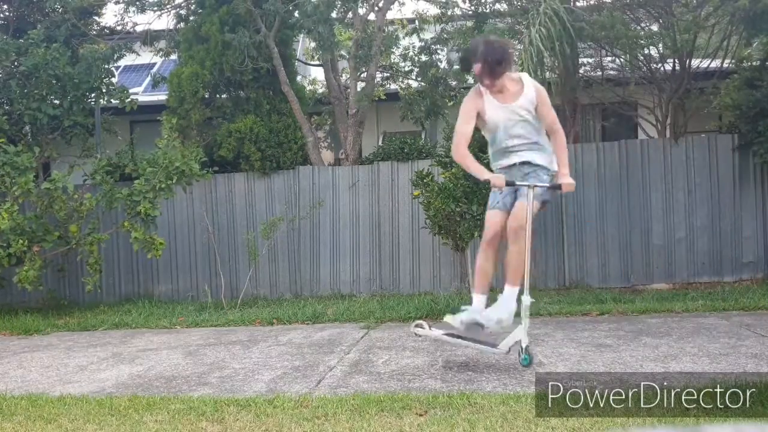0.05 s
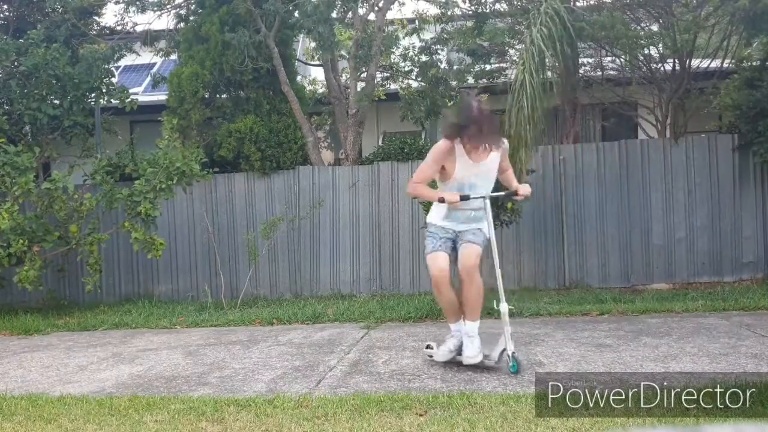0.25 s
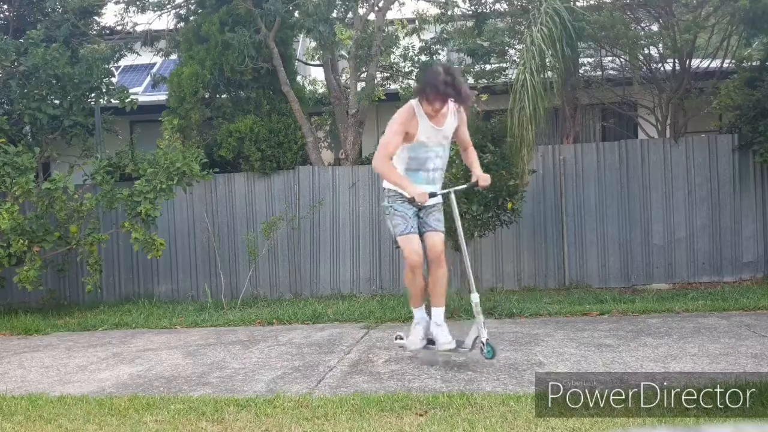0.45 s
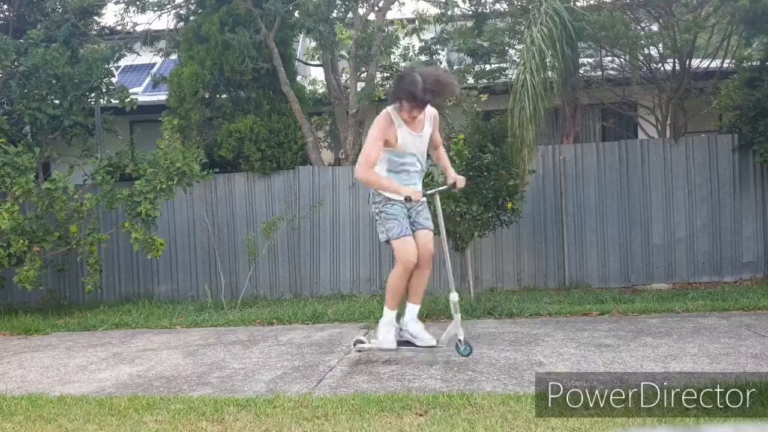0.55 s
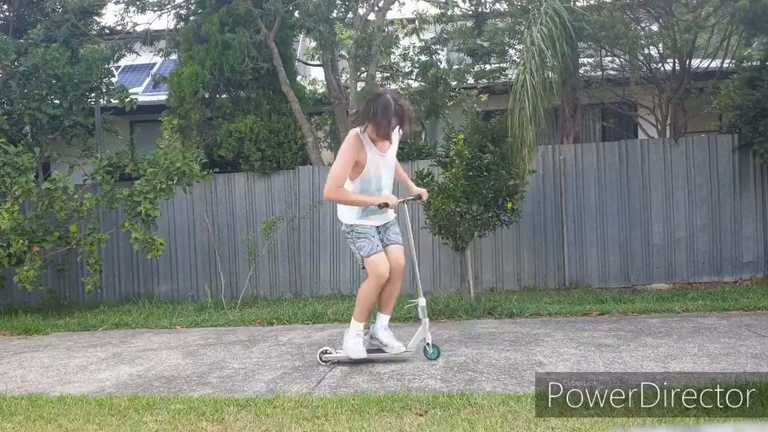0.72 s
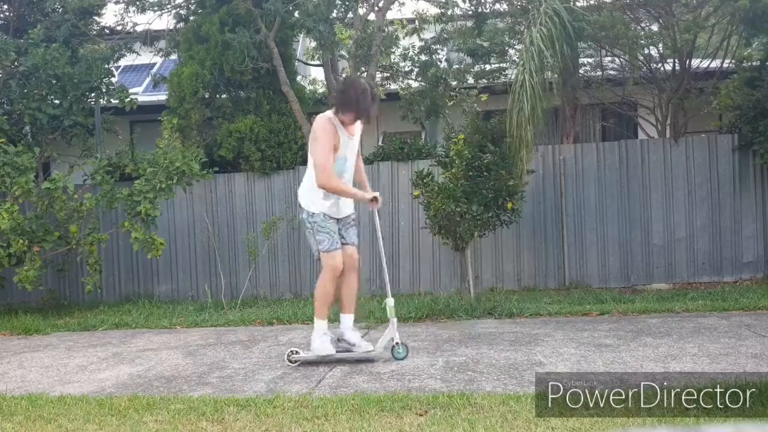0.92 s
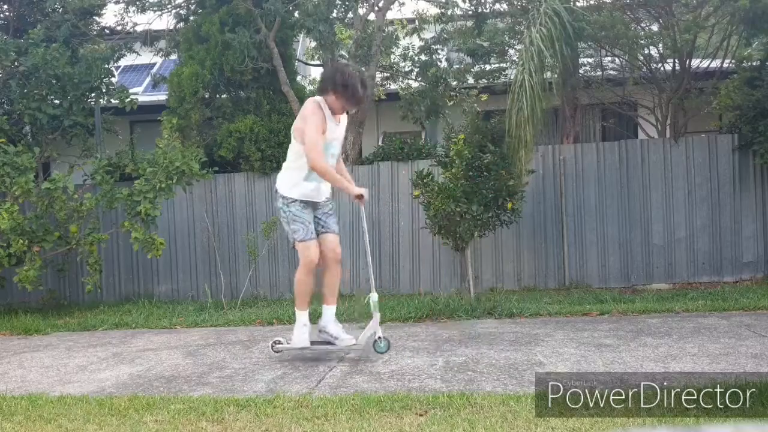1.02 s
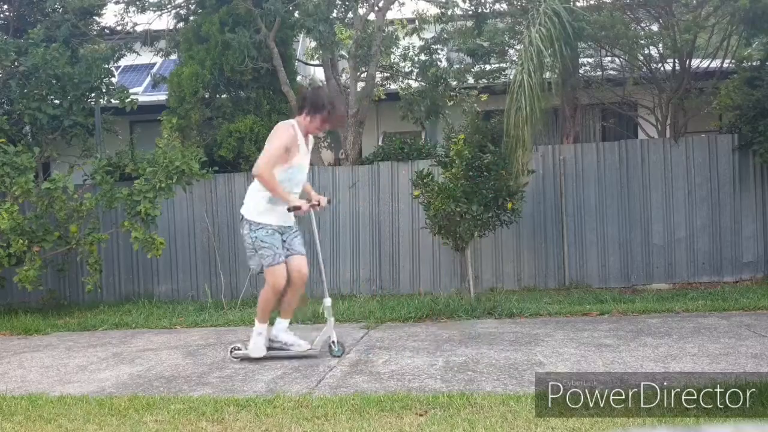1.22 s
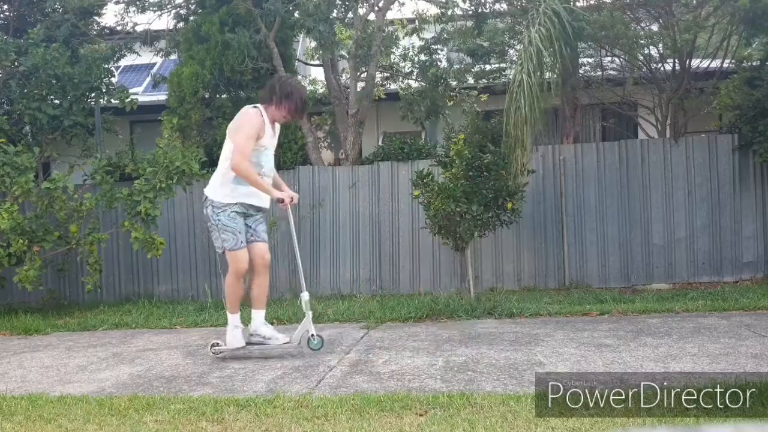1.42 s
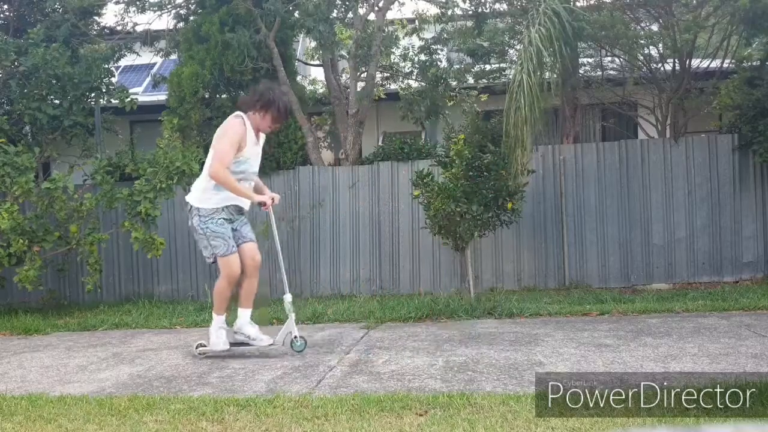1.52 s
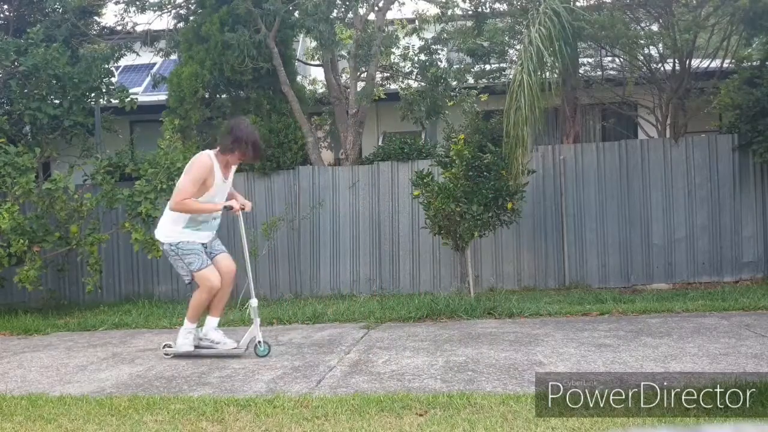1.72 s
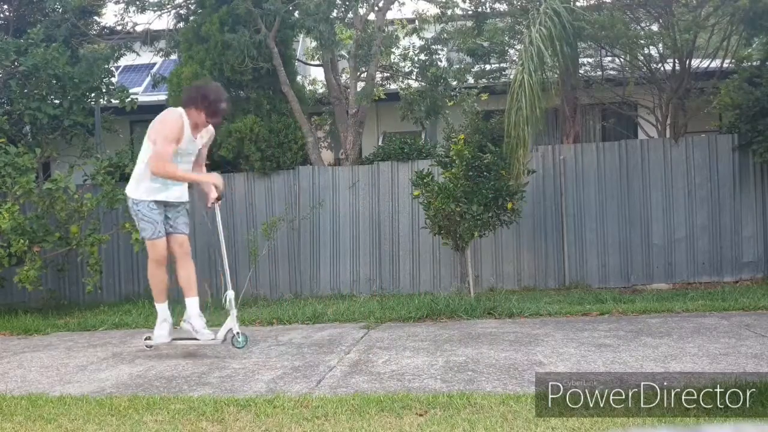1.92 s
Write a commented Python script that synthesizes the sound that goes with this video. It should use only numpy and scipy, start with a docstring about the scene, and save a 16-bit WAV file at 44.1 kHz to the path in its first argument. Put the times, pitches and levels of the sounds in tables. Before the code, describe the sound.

A scooter slams down on concrete, its deck knocking and its metal bars rattling. It then hops three times with smaller clacks, drifting slightly from right to left, with faint wheel whirr and a short echo in a quiet yard.

```python
"""A stunt scooter on concrete

A scooter lands hard on a driveway, then hops three times from right to left, its wheels whirring.
Each contact thumps, knocks the deck and rattles the metal fork and bars; the hardest slam the tyres
and crack sharply. A fence returns one echo; the yard adds a short tail, a low rumble and a faint hiss."""
import sys
import numpy as np
from scipy import signal
from scipy.fft import rfft, irfft
from scipy.io import wavfile
from scipy.ndimage import uniform_filter1d

SR = 44100
rng = np.random.default_rng(int(sys.argv[2]) if len(sys.argv) > 2 else 0)


def store_pcm(level_fs):
    """Save levels as 16-bit WAV."""
    pcm = np.round(np.clip(level_fs, -1, 1) * 32767).astype(np.int16)
    wavfile.write(sys.argv[1], SR, np.atleast_2d(pcm).T)


N = 85995
T = np.arange(16384) / SR  # seconds since a contact
METAL_CORRELATION = 0.77  # between left and right

# Modes of wheels and rider. Each row: frequency in Hz, relative level in dB, T60 in seconds.
THUMP_MODES = [(81.6, -2.5, 0.072), (145, 7, 0.036)]
# Spectrum of a bright snap. Each row: frequency in Hz, relative level in dB.
SNAP_SPECTRUM = [(3000, -7.5), (7400, -2.5), (9300, -4.5), (11300, 2), (13200, -9), (16500, -4.5)]


def amp(db):
    """Decibels as an amplitude ratio."""
    return 10 ** (np.asarray(db) / 20)


def read(points, hz):
    """Interpolation on a logarithmic frequency axis."""
    f, value = np.transpose(points)[:2]
    return np.interp(np.log(hz + 1), np.log(f), value)


def freqs(x):
    """The Fourier frequencies of x in Hz."""
    return np.fft.rfftfreq(x.shape[-1], 1 / SR)


def colour(x, points):
    """Minimum-phase filtering by a (Hz, dB) spectrum: no sound precedes its cause."""
    size = x.shape[-1]
    log_gain = np.log(amp(read(points, abs(np.fft.fftfreq(size, 1 / SR)))))
    response = np.exp(np.conj(signal.hilbert(log_gain)))[:size // 2 + 1]
    return irfft(rfft(x) * response, size)


def blow(x, db):
    """Energy scaling: x gets the energy of 16 ms of sound at this level."""
    energy = np.mean(np.sum(x ** 2, -1))
    return amp(db) * x / np.sqrt(energy / (0.016 * SR) + 1e-20)


def add(mix, s, sound):
    """Superposition: the sound joins the mix at s seconds."""
    part = mix[:, max(round(s * SR), 0):][:, :sound.shape[-1]]
    part += sound[..., :part.shape[-1]]


def diffuse(size):
    """A diffuse field: the channels are alike at long wavelengths, unrelated at short ones."""
    # Each row: frequency in Hz, left-right correlation.
    coherence = [(30, 0.93), (80, 0.73), (300, 0.87), (800, 0)]
    noise = rng.standard_normal((2, size))
    left, other = rfft(noise)
    same = read(coherence, freqs(noise))
    return irfft(np.array([left, same * left + np.sqrt(1 - same ** 2) * other]), size)


def open_air():
    """Ambient noise: diffuse rumble, midrange air and hiss, each drifting in level."""
    # Spectra. Each row: frequency in Hz, relative spectral density in dB.
    rumble, air, hiss = [(20, -28), (45, 10), (58, -1), (74, 3), (100, -6.5), (138, -8.5), (400, -58.5)], [(150, -2), (250, -2), (500, -3), (900, -4), (2100, -10.5),
                                         (3000, -18), (9000, -37)], [(2000, -16.5), (3500, -4), (7300, 3), (8500, -4),
                                                      (15000, -6.5)]
    # Envelopes. Each row: time in seconds, level in dB.
    rumble_level = [(0, -38), (.95, -44), (1.2, -51), (1.6, -50), (1.95, -45)]
    air_level = [(0, -49), (.6, -55.5), (1.2, -59.5), (1.95, -61)]
    hiss_level = [(0, -63.5), (1.95, -67.5)]
    t, out = np.arange(N) / SR, np.zeros((2, N))
    for spectrum, level in (rumble, rumble_level), (air, air_level), (hiss, hiss_level):
        noise = colour(diffuse(N), spectrum)
        out += noise / noise.std() * amp(np.interp(t, *np.transpose(level)))
    return out


def wheels(fade_s=0.052):
    """Band-limited noise: the wheels whirr, spinning in the air and then rolling on concrete."""
    # Each row: start and end in seconds, centre and width in Hz, level in dB.
    bands = [(-.08, 0.16, 623, 55, -52), (-.05, 0.232, 1500, 940, -57.5), (0.325, 0.65, 4300, 1520, -67.5),
             (0.78, 1.19, 2025, 237, -69)]
    t, out = np.arange(N) / SR, np.zeros((2, N))
    for start, end, hz, width_hz, db in bands:
        whirr = irfft(rfft(diffuse(N)) / (1 + (2 * (freqs(t) - hz) / width_hz) ** 2), N)
        fade = np.clip(np.minimum(t - start, end - t) / fade_s, 0, 1)
        out += amp(db) * whirr / whirr.std() * fade
    return out


def ring(modes, retune=0.025):
    """Free vibration as damped sines; the rider's shifting load retunes them for every blow."""
    shifts = 1 + retune * rng.uniform(-1.02, 1, len(modes))
    return sum(amp(db - 60 * T / t60) * np.sin(2 * np.pi * hz * shift * T)
               for (hz, db, t60), shift in zip(modes, shifts))


def body(thump_db, knock_db, bright_hz):
    """Modal response of wheels, rider and deck: a softer blow excites fewer high deck modes."""
    # Each row: frequency in Hz, relative level in dB, T60 in seconds.
    deck_modes = [(239.6, 4.5, 0.068), (336, 0.5, 0.018), (406.6, 0.5, 0.063), (590, -7.5, 0.055),
                  (710, -2, 0.032), (818, -9.5, 0.08), (869, -7.5, 0.052), (1190, -34, 0.04)]
    driven = [(hz, db - 10 * np.log10(1 + (hz / bright_hz) ** 4), t60) for hz, db, t60 in deck_modes]
    knock = ring(driven[::2]) - ring(driven[1::2])  # neighbouring modes alternate in sign
    thump = ring(THUMP_MODES) * (1 - np.exp(-T / 0.0076))
    return blow(thump, thump_db) + blow(knock, knock_db)


def rattle(decay_s, correlation, rise_s=0.0005, grain_db=1.5):
    """Tiny uneven impacts merge into an exponentially decaying burst of noise."""
    left, other, grain = rng.standard_normal((3, len(T)))
    grain = uniform_filter1d(grain, size=25) * np.sqrt(25)  # smoothed, with unit variance
    envelope = (1 - np.exp(-T / rise_s)) * np.exp(-T / decay_s) * amp(grain_db * grain)
    return envelope * np.array([left, correlation * left + np.sqrt(1 - correlation ** 2) * other])


def favour(hz, centre_hz, peak_db, octaves):
    """Selective excitation: extra dB near the resonance that a contact drives hardest."""
    return peak_db * np.exp(-.5 * (np.log2(hz / centre_hz) / octaves) ** 2)


def peaked(points, *resonance):
    """A spectrum with a resonance peak added."""
    hz = np.geomspace(100, 16000, 200)
    return np.transpose([hz, read(points, hz) + favour(hz, *resonance)])


def tubes(*resonance, grip_s=0.015):
    """Damped resonance: the fork and bars ring while the rider's grip absorbs their energy."""
    # Each row: frequency in Hz, relative level in dB, T60 in seconds without the grip.
    tube_modes = [(3100, 0, 0.05), (3830, -0.5, 0.028), (4091, 6.5, .032), (4270, -6, 0.037),
                  (5044, -11, 0.22), (5440, -9, 0.017), (5460, 0, 0.031), (6150, -0.5, 0.047)]
    driven = [(hz, db + favour(hz, *resonance), t60) for hz, db, t60 in tube_modes]
    return ring(driven) * np.exp(-T / grip_s)


def hardware(clack_db, clack_hz, metal_db, metal_hz, snap_db, decay_s):
    """Impact noise and forced vibration: a wheel clacks, and loose parts rattle and drive the tubes."""
    # Spectra of wheel and metal noise. Each row: frequency in Hz, relative level in dB.
    clack_spectrum = [(300, -25), (750, 3.5), (1250, -0.5), (2100, -3.5), (2900, -5.5), (5000, -14),
                      (16000, -70.5)]
    clank_spectrum = [(1500, -49), (2800, 7), (3450, -11.5), (4100, 4), (4800, 2), (5600, 1.5), (6300, -3),
                      (7300, -2.5), (16000, -26.5)]
    wheel, metal = (clack_hz, 11.5, 0.16), (metal_hz, 9.5, 0.17)  # resonances: Hz, dB, octaves
    shake = rattle(decay_s, METAL_CORRELATION)
    ringing = signal.fftconvolve(shake, tubes(*metal)[None], axes=1)[:, :len(T)]
    clack = colour(rattle(decay_s, correlation=0.73), peaked(clack_spectrum, *wheel))
    clank = colour(rattle(decay_s, METAL_CORRELATION), peaked(clank_spectrum, *metal))
    snap = colour(rattle(decay_s, correlation=0.083), SNAP_SPECTRUM)
    return (blow(clack, clack_db) + blow(ringing, metal_db - 9.5)
            + blow(clank, metal_db - 2.5) + blow(snap, snap_db))


def click(spectrum, db, decay_s=0.00068):
    """A hard, very short contact radiates a broad band."""
    return blow(colour(rattle(decay_s, METAL_CORRELATION), spectrum), db)


def slam(db, hz, rise_s=0.00036, decay_s=0.0018):
    """Volume displacement: a squashed tyre pushes out one heavily damped pulse of air."""
    return blow(np.sin(2 * np.pi * hz * T) * (1 - np.exp(-T / rise_s)) * np.exp(-T / decay_s), db)


def clang(db, hz, peak_db=29, octaves=0.096):
    """Impulse response: the fork strikes the tubes directly, ringing mainly the modes near hz."""
    return blow(tubes(hz, peak_db, octaves), db)[None]


def contacts():
    """Impact excitation: every contact as (start in seconds, low part, high part)."""
    # Wheel contacts. Each row: start in seconds, thump in dB, knock in dB, knock cutoff in Hz, clack
    # in dB, its centre in Hz, base metal level in dB, its centre in Hz, snap in dB, decay in seconds.
    hits = [(0.2171, -47, -36.5, 704, -54, 1370, -47.5, 5700, -64, 0.0095),
            (0.2235, -47, -40, 900, -42.5, 900, -44, 5700, -68, 0.0061),
            (0.2419, -17.5, -23, 606, -36, 1150, -35.5, 4600, -51, 0.0073),
            (0.2528, -26.5, -20.5, 760, -32.5, 815, -33.5, 3500, -37.5, 0.0057),
            (.2560, -49, -18.5, 930, -42.5, 1090, -26.5, 5630, -33, 0.0064),
            (0.2829, -34, -36.5, 450, -45.5, 2220, -37, 4030, -40, 0.0094),
            (.3185, -37, -38, 396, -39.5, 1264, -61, 4500, -61, 0.0081),
            (0.7351, -19.5, -29, 450, -38.5, 910, -49.5, 4200, -74, .005),
            (0.7385, -41, -30, 497, -41.5, 2110, -41, 5650, -55, 0.0048),
            (0.7447, -23.5, -29, 510, -47, 774, -49, 4100, -65, 0.007),
            (.7620, -58, -33.5, 403, -52, 2050, -51.5, 6040, -56.5, 0.0097),
            (1.251, -58, -42.5, 380, -49.5, 1730, -59, 4180, -61, 0.017),
            (1.2761, -37, -30, 320, -41, 1730, -40.5, 4130, -49, 0.0046),
            (1.2972, -37.5, -33.5, 556, -49, 1150, -44, 6900, -63, 0.0056),
            (1.324, -38, -41.5, 277, -54, 1780, -63, 4340, -64, 0.0051),
            (1.4938, -76, -94, 600, -56.5, 2150, -51, 3250, -57, 0.0018),
            (1.6773, -35.5, -45, 404, -41.5, 1340, -51.5, 4100, -65.5, 0.0068),
            (1.6845, -39.5, -37.5, 490, -45, 1550, -54, 4100, -68, 0.0092),
            (1.7020, -36, -39.5, 494, -47, 1350, -48.5, 3930, -56, 0.025)]
    # A wheel or the deck first meets the ground. Each row: start in seconds, level in dB.
    cracks = [(.2250, -40.5), (0.2424, -36.5), (0.7369, -43), (1.2770, -38.5)]
    # Each row: frequency in Hz, relative level in dB.
    crack_spectrum = [(2300, 0), (6500, -6), (12000, -23)]
    # Each row of both: start in seconds, level in dB, frequency in Hz.
    slams = [(.2360, -26, 129), (0.2527, -15.5, 323), (1.2767, -28.5, 318), (1.6750, -42.5, 260)]
    clangs = [(0.2565, -29.5, 5830), (.2848, -40, 3920), (0.7352, -45, 4030), (0.745, -52, 4120),
              (1.6985, -54, 5770)]
    # A loose part ticks. Each row: start in seconds, level in dB.
    ticks = [(0.32, -48.5), (1.084, -62.5)]
    silence = np.zeros((2, len(T)))
    events = [(s, body(thump, knock, hz), hardware(*rest)) for s, thump, knock, hz, *rest in hits]
    events += [(s, slam(db, hz), silence) for s, db, hz in slams]
    events += [(s, silence, click(crack_spectrum, db)) for s, db in cracks]
    events += [(s, silence, click(SNAP_SPECTRUM, db)) for s, db in ticks]
    return events + [(s, silence, clang(db, hz)) for s, db, hz in clangs]


def yard(x, rise_s=0.0041):
    """Reverberation: trees and house walls return a thin tail, each band dying at its own rate."""
    # Each row: frequency in Hz, gain in dB, T60 in seconds.
    bands = [(71.5, -2, 0.18), (285, -12, 0.25), (735, -12.5, 0.34), (1660, -6, 0.42), (6130, -10, 0.37),
             (9600, -4, 0.4), (14100, -3, 0.33)]
    hz, t, noise = signal.stft(diffuse(SR), SR, nperseg=512)
    t60 = read([(f, decay) for f, _, decay in bands], hz)[:, None]
    envelope = amp(-60 * t / t60) * (1 - np.exp(-t / rise_s))
    envelope *= amp(read(bands, hz))[:, None] / np.sqrt(SR * np.mean(envelope ** 2, 1, keepdims=True))
    response = signal.istft(noise * envelope, SR, nperseg=512)[1]
    return signal.fftconvolve(x, response, axes=1)[:, :N]


def fence_echo(low, high, low_db=-25.5, high_db=-28):
    """Reflection and scattering: long waves return whole, while the palings spread short ones in time."""
    palings = rattle(decay_s=0.006, correlation=0.37)
    scattered = signal.fftconvolve(high, palings / np.linalg.norm(palings[0]), axes=1)[:, :len(T)]
    return amp(low_db) * low + amp(high_db) * scattered


def shove(db):
    """Gradual loading: the rider's weight flexes the deck and excites only the lowest mode."""
    return blow(ring(THUMP_MODES[:1]) * (1 - np.exp(-T / 0.011)) * np.exp(-T / 0.05), db)


def scooter():
    """Arrival-time differences place each contact on the path; echoes and shoves stay central."""
    # Each row: time in seconds, lead at the left microphone in ms, fence echo delay in ms.
    path = [(.25, -0.044, 28), (.74, -0.017, 21), (1.277, 0.05, 21.3), (1.68, 0.14, 22.4)]
    # Each row: start in seconds, level in dB.
    shoves = [(0.333, -36), (0.83, -37), (1.257, -34), (1.644, -35)]
    out = np.zeros((2, N))
    when, leads, echoes = np.transpose(path)
    for s, low, high in contacts():
        lead_s, echo_s = np.interp(s, when, leads) / 1000, np.interp(s, when, echoes) / 1000
        far_side_delay = np.exp(2j * np.pi * freqs(low) * np.minimum([[lead_s], [-lead_s]], 0))
        add(out, s, irfft(rfft(low + high) * far_side_delay))
        add(out, s + echo_s, fence_echo(low, high))
    for s, db in shoves:
        add(out, s, shove(db))
    return out


def scene():
    """Superposition of the impacts, their reverberation, the wheels and the open air."""
    impacts = scooter()
    return impacts + open_air() + yard(impacts) + wheels()


def record(dry, low_cut_hz=48.4, edge_hz=15850):
    """Band limiting: the microphones' bass cut, then a steep low-pass filter."""
    x = signal.sosfilt(signal.butter(2, low_cut_hz, "high", fs=SR, output="sos"), dry)
    low_pass = signal.firwin(401, edge_hz, window=("kaiser", 9), fs=SR)
    return signal.oaconvolve(x, low_pass[None], "same")


dry = scene()
out = record(dry)
store_pcm(out)
```